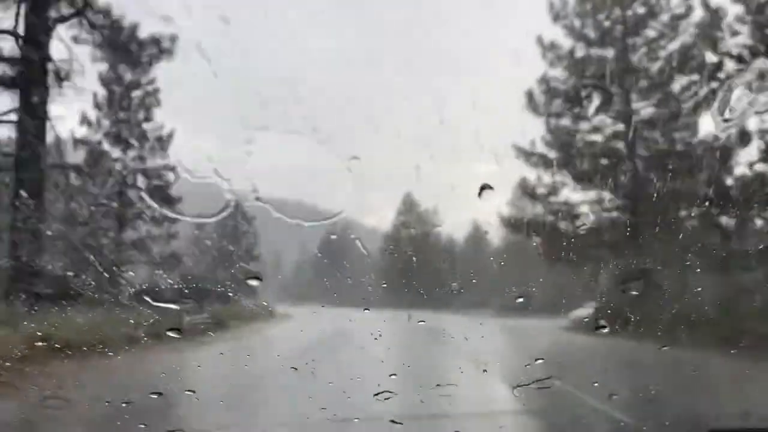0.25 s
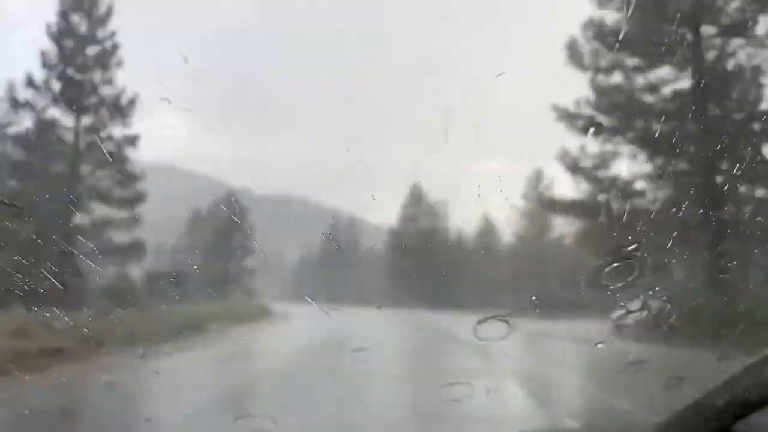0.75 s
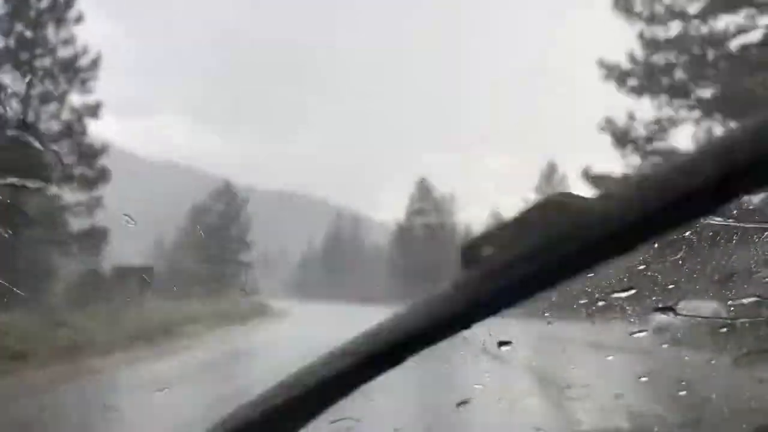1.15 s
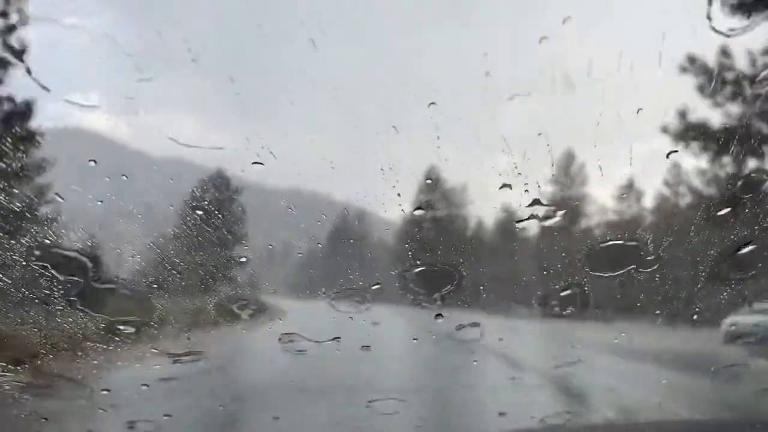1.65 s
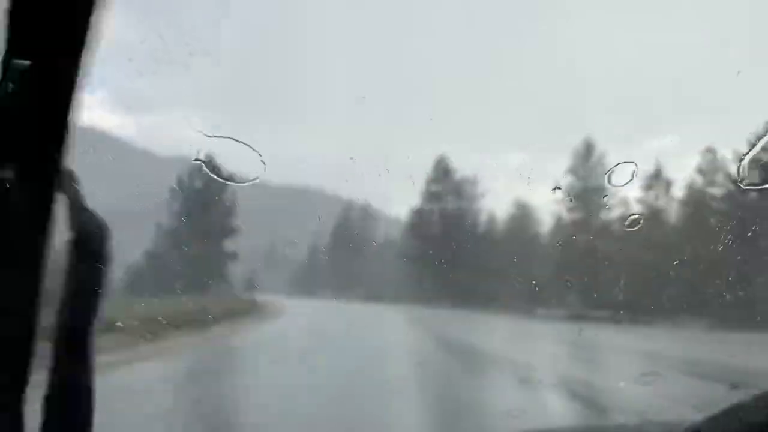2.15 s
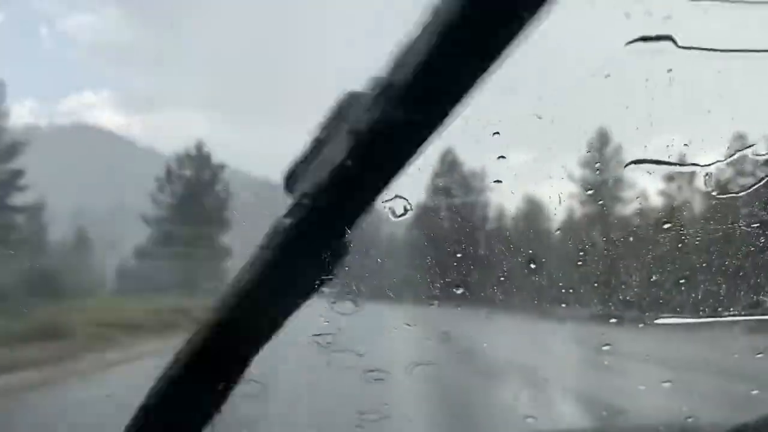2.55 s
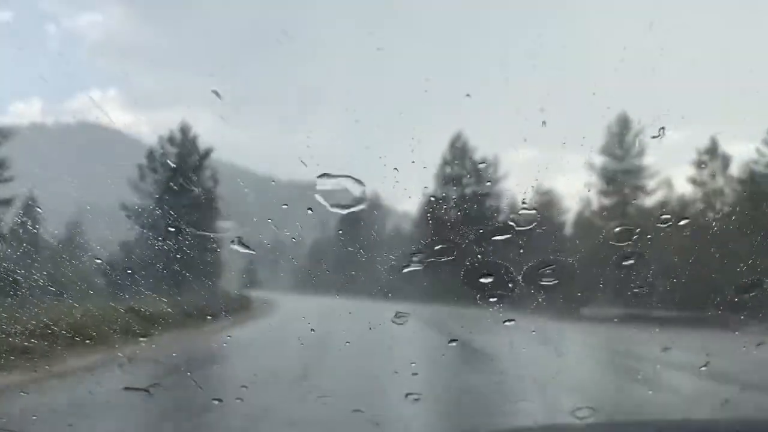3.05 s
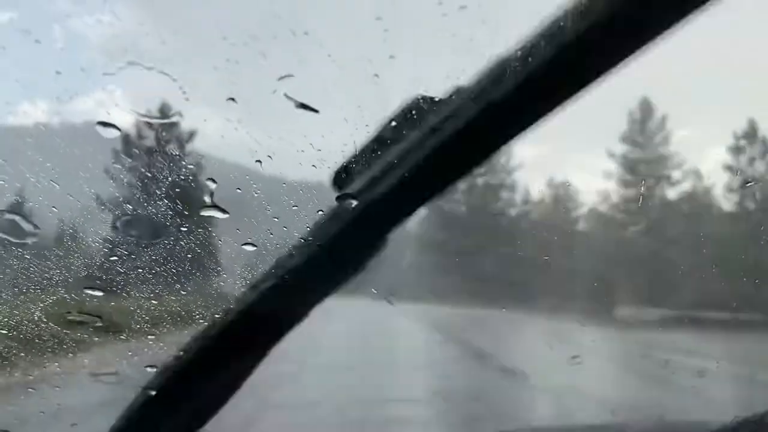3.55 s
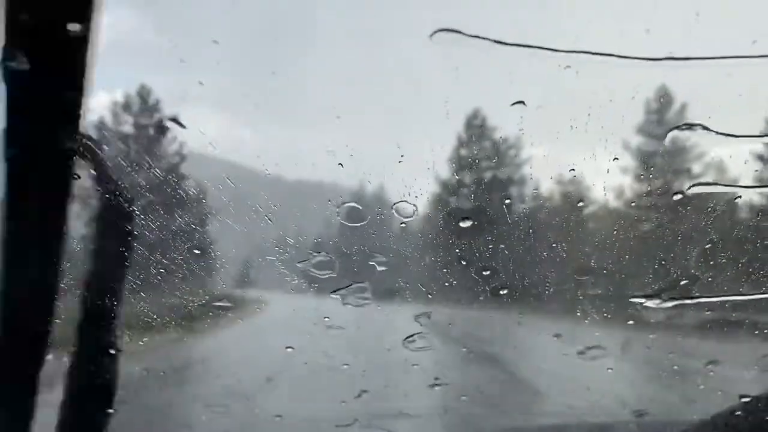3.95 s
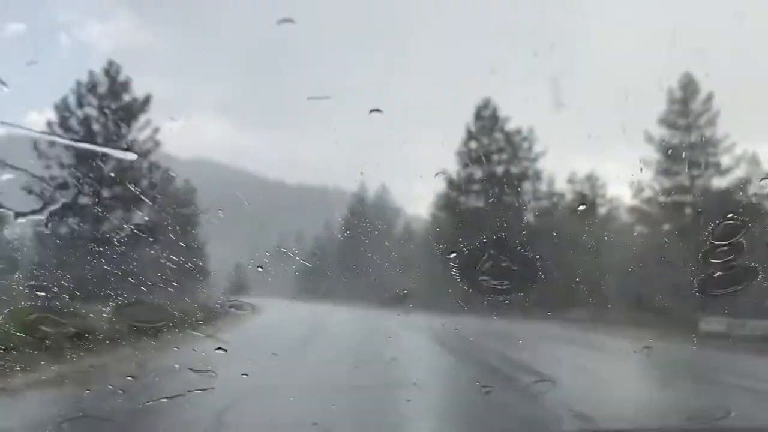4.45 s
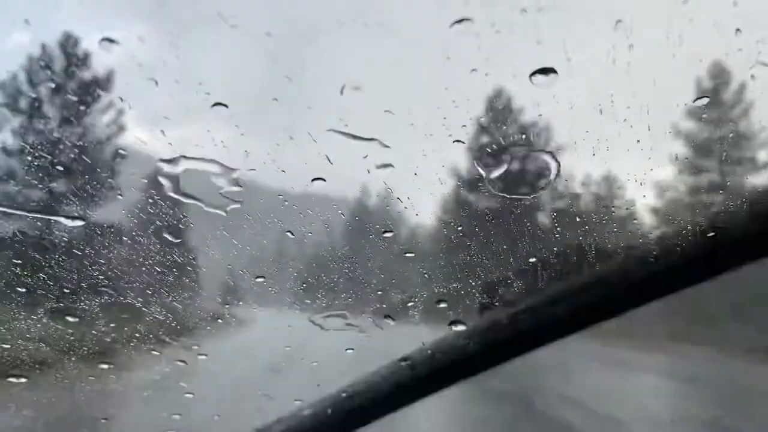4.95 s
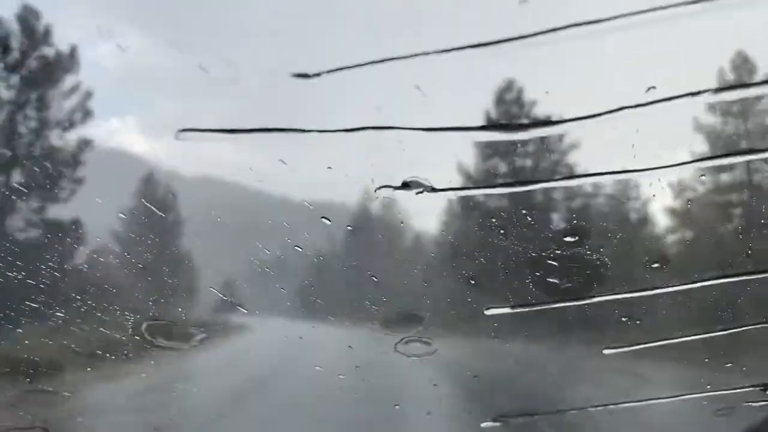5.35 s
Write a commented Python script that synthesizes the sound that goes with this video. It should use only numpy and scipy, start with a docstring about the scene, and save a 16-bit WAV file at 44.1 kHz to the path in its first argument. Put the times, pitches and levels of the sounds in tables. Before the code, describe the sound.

For about 5.6 seconds we sit inside a car driving through heavy rain. From the first instant a dense, crackling patter covers roof and windshield: dull short splashes, brighter glass ticks and a soft flickering hiss of spray. Under it a loud, deep tyre rumble surges unevenly. Fat drops cluster in the first half second, with a hard, bright smack near 0.35 s. Dull roof knocks come around 0.3, 1.4, 1.9 and 3.3 s. The rain swells near 1 s, thins around 1.8 s, and strengthens again at about 3.5 s with another cluster of heavy drops. Tiny hushes, each only a few hundredths of a second, end abruptly near 0.5, 0.75, 1.25, 3.2 and 5.25 s. Soft bass jolts nudge the cabin throughout, strongest around 4.5 and 4.8 s. The cabin is small and padded, with almost no echo; the rain is wide, the bass central. It stops mid-downpour.

```python
"""Heavy rain on the windshield and roof of a car, heard from inside as it drives on a wet road.
Each drop is a snap, a short noisy splash and a few ringing tones; random drops of all sizes make the patter.
Filtered noise makes the hiss of spray and the low rumble of tyres shaking the cabin.
Single big drops, roof knocks and dull thumps, made from short rings, come at set times."""
import sys
import numpy as np
from scipy import signal
from scipy.fft import rfft, irfft, next_fast_len
from scipy.io import wavfile
from scipy.ndimage import uniform_filter1d

SR = 44100
rng = np.random.default_rng(int(sys.argv[2]) if len(sys.argv) > 2 else 0)


def dump(signal):
    """Clip the signal to [-1, 1] and save it as 16-bit WAV at the path in sys.argv[1]."""
    limited = np.clip(np.atleast_2d(signal).T, -1, 1)
    pcm = np.round(limited * 32767).astype(np.int16)
    wavfile.write(sys.argv[1], SR, pcm)


N = 247268
TIME = np.arange(N) / SR

# every short hit starts after a little silence, so its age is negative at first
LEAD_IN_S = 0.002
HIT_AGE = TIME[:4000] - LEAD_IN_S

# tone of the glass and roof under the drops: (frequency [Hz], level [dB per Hz])
GLASS = [(150, -18), (420, -1.5), (580, -3.5), (680, -4), (800, -1), (1100, -2), (1330, -3), (1550, -1.5),
         (1950, -4), (2350, -1.5), (2600, -3.5), (3000, 0.05), (3380, -1), (3900, -5), (5000, -7.5),
         (7000, -11.5), (9500, -12), (13000, -21), (15500, -24.5)]


def from_db(db):
    """Turn decibels into a gain."""
    return 10 ** (np.asarray(db) / 20)


def rms_one(x):
    """Scale a sound to an average strength (rms) of 1."""
    return x / np.sqrt(np.mean(x ** 2) + 1e-20)


def level_curve(rows):
    """Gain at every sample, from rows of (time [s], level [dB])."""
    times, db = np.transpose(rows)
    return from_db(np.interp(TIME, times, db))


def at_hz(rows, hz):
    """Read each column of a table at any frequency, by straight lines over log frequency."""
    points, *columns = np.transpose(rows)
    return [np.interp(np.log(hz + 1e-9), np.log(points), column) for column in columns]


def drift(corner_hz):
    """Smooth random wandering with an rms of 1; changes faster than the corner are weakened."""
    hz = np.arange(N // 2 + 1) * SR / N
    smooth = rfft(rng.standard_normal(N)) / (1 + (hz / corner_hz) ** 2)
    return rms_one(irfft(smooth, N))


def add(out, sound, start):
    """Mix a sound into the track from a given sample on."""
    start = max(int(start), 0)
    part = sound[..., :max(N - start, 0)]
    out[..., start:start + part.shape[-1]] += part


def below(x, hz):
    """The part of a sound under a given frequency."""
    return signal.sosfiltfilt(signal.butter(4, hz, fs=SR, output="sos"), x)


def smooth_power(sound, first, second):
    """Power of both channels, averaged over two sliding windows given in samples."""
    power = np.mean(sound ** 2, axis=0)
    return uniform_filter1d(uniform_filter1d(power, size=first), size=second)


def in_cabin(pair, spectrum):
    """Colour two unrelated signals and blend them into left and right, as two microphones hear the cabin."""
    # (frequency [Hz], likeness of the channels [0-1], phase lead of the left [rad], left minus right [dB])
    microphones = [(40, 0.994, 0, 0), (110, 0.96, 0, 1.3), (230, 0.85, 0, 0.5), (400, 0.5, 0, -0.5),
                   (650, 0.09, -2, -0.2), (1100, 0.12, -2.5, 0), (1600, 0.39, -1.4, -0.3),
                   (2200, 0.6, 0.0, 1.3), (3200, 0.58, 0.8, 2.0), (5700, 0.34, 0.5, 2.2),
                   (6700, 0.42, -0.1, 0.0), (8500, 0.75, -3.3, -0.0), (10100, 0.94, -6.3, -0.2),
                   (12050, 0.93, -9.4, -0.1), (13950, 0.93, -12.6, 0.1), (15600, 0.71, -15.6, 0.1)]
    length = pair.shape[1]
    size = next_fast_len(length + 2048)
    hz = np.arange(size // 2 + 1) * SR / size
    alike, lead, pan_db = at_hz(microphones, hz)
    alike = np.clip(alike, 0, 0.995)

    # the last factor weakens everything below about 15 Hz
    colour = from_db(at_hz(spectrum, hz)[0]) * hz ** 2 / (hz ** 2 + 15 ** 2)
    mid, side = rfft(pair, size) * colour
    sign = np.array([[1], [-1]])  # left, right
    ears = np.sqrt(1 + alike) * mid + sign * np.sqrt(1 - alike) * side
    ears = ears * from_db(sign * pan_db / 2) * np.exp(sign * 1j * lead / 2)
    return irfft(ears, size)[:, :length]


def pings(age, t60, count):
    """A drop sets a few bending modes of the panel ringing; t60 [s] holds at 3000 Hz, total energy 1."""
    hz = np.exp(rng.uniform(np.log(500), np.log(7000), (count, 1)))
    # higher modes die faster
    modes = np.sin(2 * np.pi * hz * age) * from_db(-60 * age / t60 * np.sqrt(hz / 3000))
    # each mode reaches the two microphones in its own way
    sound = rng.standard_normal((2, count)) @ (modes * (hz / 3000) ** 0.77)
    return sound / np.linalg.norm(sound)


def splat(ring_t60, snap_db, ping_db, cabin_db, tilt_db):
    """One drop: a snap, a brief ring of the panel, then the small padded cabin; energy 1 per channel."""
    landed, age = HIT_AGE >= 0, np.maximum(HIT_AGE, 0)
    sound = from_db(ping_db) * pings(age, t60=0.064, count=4)

    # the panel holds its low tones longer than its highs
    for low, high in [(60, 1800), (1800, 6000), (6000, 18000)]:  # Hz
        t60 = ring_t60 * (6000 / high) ** 0.41
        swell = 1 - np.exp(-age / 0.00036)
        panel = from_db(-60 * age / t60)
        cabin = from_db(cabin_db - 60 * age / 0.095)
        fade = swell * (panel + cabin)
        burst = rng.standard_normal(sound.shape) * fade / np.linalg.norm(fade)
        sound += signal.sosfilt(signal.butter(2, [low, high], "band", fs=SR, output="sos"), burst)

    # the impact itself arrives first, as one sharp spike
    sound[:, np.argmax(landed)] += from_db(snap_db) * rng.choice([-1, 1], 2)

    # every spot favours other tones; tilt is in dB per octave
    hz, db = np.transpose(GLASS)
    colour = db + tilt_db * np.log2(hz / 3000) + 2.0 * rng.standard_normal(len(hz))
    return rms_one(in_cabin(sound, np.column_stack([hz, colour]))) / np.sqrt(len(age))


def patter(per_s, spread_db, largest, flurry_db, ring_t60, snap_db, ping_db, cabin_db, tilt_db, count):
    """Drops of random size land on many spots of a panel, in little flurries; largest caps the size."""
    chance, spots, sizes = rng.random(N), rng.integers(0, count, N), rng.standard_normal(N)
    lands = chance < per_s * from_db(flurry_db * drift(25)) / SR
    out = np.zeros((2, N))
    for spot in range(count):
        spot_tilt_db = tilt_db + rng.standard_normal()
        sound = splat(ring_t60, snap_db, ping_db, cabin_db, spot_tilt_db)
        for start in np.flatnonzero(lands & (spots == spot)):
            add(out, from_db(spread_db * min(sizes[start], largest)) * sound, start)
    # even out the amount of water over about a tenth of a second
    water = smooth_power(out, 2800, 1900)
    return rms_one(out / np.sqrt(water + 0.05 * water.mean()))


def smack(ring_t60, tilt_db):
    """A drop close to the microphones: a sharp snap with little of the cabin."""
    return splat(ring_t60=ring_t60, snap_db=-3.5, ping_db=-17, cabin_db=-24, tilt_db=tilt_db)


def close_drops(per_s, level_db, spread_db, ring_t60, tilt_db, count):
    """Middling drops tick at random on a few spots of the nearest glass."""
    chance, spots, sizes = rng.random(N), rng.integers(0, count, N), rng.standard_normal(N)
    sounds = [smack(ring_t60, tilt_db + 0.63 * rng.standard_normal()) for _ in range(count)]
    out = np.zeros((2, N))
    for start in np.flatnonzero(chance < per_s / SR):
        add(out, from_db(level_db + spread_db * sizes[start]) * sounds[spots[start]], start)
    return out


def spray(flicker_db, tilt_db):
    """Countless tiny droplets merge into a soft, flickering hiss: filtered noise."""
    colour = [(hz, db + tilt_db * np.log2(hz / 3000)) for hz, db in GLASS]
    hiss = rms_one(in_cabin(rng.standard_normal((2, N)), colour))
    return hiss * from_db(flicker_db * drift(37))


def rumble(evenness, boom_db, drone_db):
    """The tyres shake the cabin: its boom surges with the road surface, under a steady higher drone."""
    # booming of the cabin, with its air and body resonances: (frequency [Hz], level [dB per Hz])
    cabin_tone = [(20, -18), (29, -13), (40, -5.5), (50, -2), (62, -1.5), (82, -7.5), (101, 0), (120, -2),
                  (147, -15.5), (165, -9), (205, -21.5), (226, -14.5), (255, -22), (280, -25), (420, -28),
                  (1000, -56)]
    # roughness of the road, heard as rumble: (time [s], level [dB])
    road_roughness = [(0, -17.5), (0.23, -15.5), (0.33, -23.5), (0.62, -18), (0.9, -16.5), (1.3, -19.5),
                      (1.66, -16), (2.04, -19), (2.2, -14.5), (2.66, -17), (2.77, -20.5), (2.9, -17),
                      (3.14, -16.5), (3.24, -19), (3.39, -21.5), (3.52, -17), (3.93, -18), (4.14, -15.5),
                      (4.6, -16.5), (4.87, -14), (4.99, -20), (5.24, -15.5), (5.46, -21.5), (5.61, -12.5)]
    # level of the deepest bass against the rest of the boom: (time [s], level [dB])
    deep_levels = [(0, 1), (0.6, -3), (1.6, -2), (2.4, -1.5), (3.3, 0.5), (4.4, -1), (5.61, 0)]

    shake = rms_one(in_cabin(rng.standard_normal((2, N)), cabin_tone))
    boom = below(shake, 151)
    drone = shake - boom
    # partly level out the random swelling of the boom
    swell = smooth_power(boom, 3500, 2500)
    boom = rms_one(boom / swell ** (np.clip(evenness, 0, 1) / 2))
    boom = boom + (level_curve(deep_levels) - 1) * below(boom, 117)
    return from_db(boom_db) * level_curve(road_roughness) * boom + from_db(drone_db) * drone


def glass_ring(hz, t60):
    """The struck spot rings briefly in two of its own modes; energy 1 per channel."""
    age = np.maximum(HIT_AGE, 0)
    modes = np.sin(2 * np.pi * hz * np.outer([1, 1.43], age)) * from_db(-60 * age / t60)
    return rms_one(in_cabin(modes, GLASS)) / np.sqrt(len(age))


def fat_drops(gain_db, ring_db, ring_t60, tilt_db, tilt_per_db):
    """Big drops stand out, each a smack with its own ring; the harder the hit, the shorter its splash."""
    # the fattest drops on the glass and roof:
    # (time [s], level before gain_db [dB], brightness [dB], ring of the struck spot [Hz])
    big_hits = [(0.082, -21, -1, 5040), (0.111, -22, -8, 3140), (0.158, -21.5, -3, 4900),
                (0.173, -21, -5, 3790), (0.188, -22.5, -7, 3000), (0.201, -21.5, -3, 4610),
                (0.219, -19, -5, 1720), (0.233, -22.5, -7, 3200), (0.282, -20.5, -8, 1420),
                (0.345, -14, -1.5, 3490), (0.391, -22.5, 2, 5600), (0.461, -20.5, -1, 5470),
                (0.481, -21.5, -5, 3700), (0.556, -20.5, -4, 4610), (0.743, -23.5, -3, 3000),
                (0.772, -20, -4, 3700), (0.814, -21, -5, 2330), (0.908, -23, -8, 2370),
                (0.957, -22, -3, 4910), (0.982, -23, -4, 5940), (1.247, -25, 0, 5000),
                (1.269, -19, -8, 2840), (1.284, -18, -7, 2450), (1.358, -23, -3, 3300),
                (1.401, -22, -3, 3100), (1.407, -20.5, -5, 4180), (1.481, -21, -3, 3000),
                (1.623, -23.5, -11, 2900), (1.669, -22, -2, 3300), (1.856, -20.5, -4, 4440),
                (1.874, -22, -7, 3530), (1.924, -22, -6, 1810), (1.993, -22, -3, 3200),
                (2.032, -21, -6, 3320), (2.081, -22, -5, 2700), (2.135, -23.5, -1, 5000),
                (2.286, -20.5, -10, 4220), (2.298, -21, -9, 2410), (2.362, -21.5, -7, 2000),
                (2.391, -22.5, -3, 5380), (2.483, -22, -10, 3570), (2.507, -20, -9, 990),
                (2.623, -21.5, -4, 3200), (2.717, -22, -5, 3000), (2.735, -21.5, -3, 3400),
                (2.886, -21.5, -8, 3000), (3.1, -22, -7, 3490), (3.241, -21.5, -8, 3300),
                (3.481, -18.5, -7, 2370), (3.501, -21, -7, 3100), (3.536, -21, -4, 2760),
                (3.553, -21, -6, 820), (3.604, -19.5, -8, 1120), (3.635, -20.5, -5, 2500),
                (3.701, -19.5, -5, 4050), (3.717, -20.5, -7, 4350), (3.785, -22.5, -6, 4310),
                (3.955, -22.5, -5, 3100), (4.163, -24, 2, 6000), (4.241, -22.5, -2, 3300),
                (4.322, -21, -3, 4260), (4.353, -23, -1, 5200), (4.441, -22.5, -4, 6240),
                (4.523, -19.5, -6, 2020), (4.612, -21.5, -4, 4180), (4.713, -21, -4, 2600),
                (4.777, -19.5, -8, 1720), (4.799, -22, -8, 2200), (5.059, -22.5, -1, 3400),
                (5.078, -22, -2, 5640), (5.11, -20, -7, 2330), (5.258, -27, -3, 3400),
                (5.398, -21, -6, 4310), (5.421, -20.5, -7, 1770), (5.558, -19, -6, 3880)]
    # the splash time of an average hit halves for each 14 dB of extra level plus brightness
    usual_t60_s, halving_db = 0.031, 14

    out = np.zeros((2, N))
    _, usual_db, usual_treble_db, _ = np.mean(big_hits, axis=0)
    for s, db, treble_db, hz in big_hits:
        brighter = treble_db - usual_treble_db
        harder = db - usual_db + brighter
        splash_t60 = usual_t60_s * 0.5 ** (harder / halving_db)
        sound = smack(splash_t60, tilt_db + tilt_per_db * brighter)
        sound = sound + from_db(ring_db) * glass_ring(hz, ring_t60)
        add(out, from_db(db + gain_db) * sound, (s - LEAD_IN_S) * SR)
    return out


def knock(t60, pitch_hz):
    """A few low modes of the roof ring briefly, the higher ones shorter; energy 1."""
    # modes of the roof sheet: (multiple of the pitch [ratio], relative level [dB])
    roof_modes = [(1, 5), (1.31, -4), (1.87, 7)]
    age = np.maximum(HIT_AGE, 0)
    mono = np.zeros(len(age))
    for multiple, db in roof_modes:
        fade = from_db(db - 60 * age * multiple / t60)
        mono += fade * np.sin(2 * np.pi * pitch_hz * multiple * age)
    return mono / np.linalg.norm(mono)


def roof_knocks(gain_db, t60):
    """The sheet metal of the roof knocks dully under heavy water, alike in both microphones."""
    # (time [s], level before gain_db [dB], pitch [Hz])
    knock_list = [(0.218, -39, 365), (0.281, -27, 304), (1.409, -27, 436), (1.923, -29, 310),
                  (3.294, -28.5, 365)]
    out = np.zeros(N)
    for s, db, hz in knock_list:
        add(out, from_db(db + gain_db) * knock(t60, hz), (s - LEAD_IN_S) * SR)
    return out


def lulls(return_s):
    """The rain sinks during each brief hush and snaps back at its end."""
    # (time of return [s], length [s], depth [dB])
    hushes = [(0.533, .035, -2.5), (0.743, 0.044, -8), (1.245, 0.044, -6), (3.176, 0.06, -3.5),
              (5.256, 0.044, -6)]
    db = np.zeros(N)
    for s, length, depth in hushes:
        sink = np.clip((TIME - s + length) * 2 / length, 0, 1)  # full depth at half the length
        snap_back = np.clip((s - TIME) / return_s, 0, 1)
        db += depth * sink * snap_back
    return from_db(db)


def thumps(gain_db, rise_cycles):
    """A jolt through the car body swells and dies in a few cycles of one resonance."""
    # (time [s], peak before gain_db [dB], pitch [Hz])
    jolts = [(0.712, -4, 59.5), (0.953, -3.5, 94.6), (1.197, -8, 116), (1.49, -3, 104), (2.866, -7, 63.7),
             (3.466, -5.5, 110.4), (3.768, -9, 67.7), (4.064, -6.5, 106), (4.463, -1, 101), (4.815, -1, 95),
             (5.287, -5.5, 57)]
    out, t = np.zeros(N), TIME[:SR // 4]
    for s, db, hz in jolts:
        age = t * hz / rise_cycles  # the swell is fullest at age 1
        swell = (age * np.exp(1 - age)) ** 2
        add(out, from_db(db + gain_db) * swell * np.sin(2 * np.pi * hz * t), s * SR)
    return out


def scene():
    """Dense dull drumming on the roof, bright ticks that gusts sweep onto the windshield, road noise below."""
    # strength of the rain, in squalls: (time [s], level [dB])
    rain_levels = [(0, -29.5), (0.22, -29), (0.38, -28), (0.68, -31.0), (1.0, -26), (1.18, -30.0),
                   (1.52, -28.5), (1.78, -31.5), (1.92, -30.5), (3.0, -28.5), (3.15, -29), (3.53, -27.5),
                   (4.15, -30.5), (4.42, -28.5), (4.6, -30), (5.25, -29), (5.42, -28.5), (5.61, -30)]
    roof = patter(per_s=800, spread_db=5.0, largest=1.52, flurry_db=0.63, ring_t60=0.015,
                  snap_db=-5, ping_db=-5.5, cabin_db=-16.5, tilt_db=-1.0, count=64)
    windshield = patter(per_s=190, spread_db=3.2, largest=1.6, flurry_db=2.5, ring_t60=0.0065,
                        snap_db=-2.5, ping_db=-13, cabin_db=-15, tilt_db=3.0, count=40)
    # gusts sweep more or less water onto the windshield
    gusts = from_db(-5.5 + 2.2 * drift(9))
    ticks = close_drops(per_s=18, level_db=17.5, spread_db=-3.7, ring_t60=0.007, tilt_db=5, count=16)
    glass = gusts * windshield + ticks
    hiss = from_db(-14.5) * spray(flicker_db=4.5, tilt_db=-4.0)
    rain = level_curve(rain_levels) * lulls(return_s=0.0013) * (from_db(-0.7) * roof + glass + hiss)

    road = rumble(evenness=0.34, boom_db=-1.0, drone_db=-18.5)
    drops = fat_drops(gain_db=21.6, ring_db=-9.5, ring_t60=0.02, tilt_db=0.7, tilt_per_db=0.43)
    knocks = roof_knocks(gain_db=26.5, t60=0.036)
    return rain + drops + knocks + road + thumps(gain_db=-3.0, rise_cycles=1.16)


def record(dry):
    """The deepest bass is rolled off and the top of the treble is cut steeply."""
    dry = signal.sosfilt(signal.butter(2, 18, "high", fs=SR, output="sos"), dry)
    return signal.sosfilt(signal.ellip(12, 0.2, 80, 15800, fs=SR, output="sos"), dry)


dry = scene()
out = record(dry)
dump(out)
```